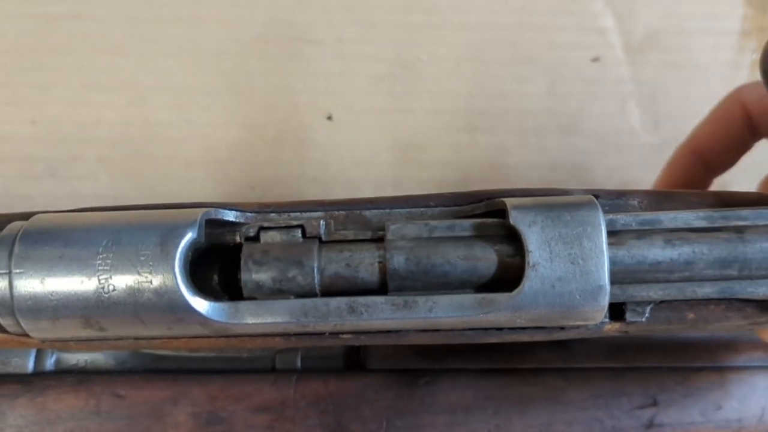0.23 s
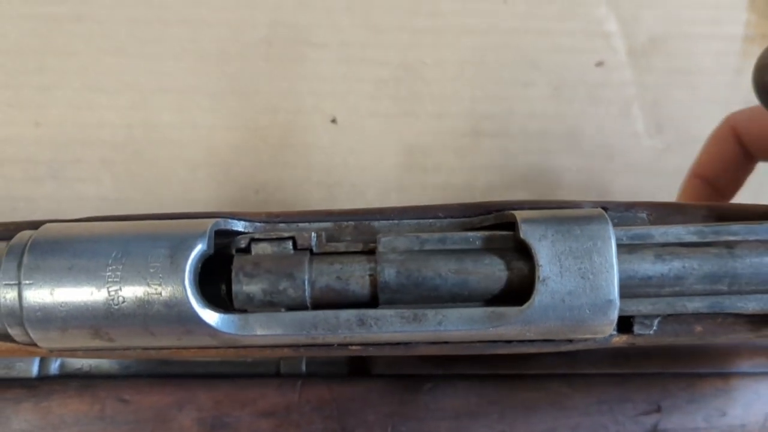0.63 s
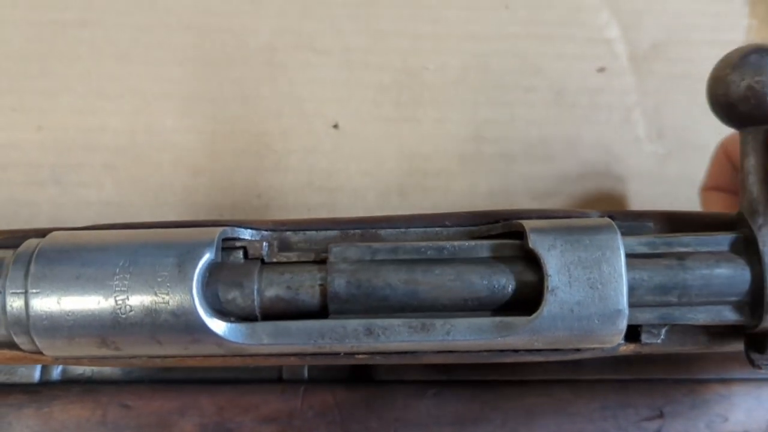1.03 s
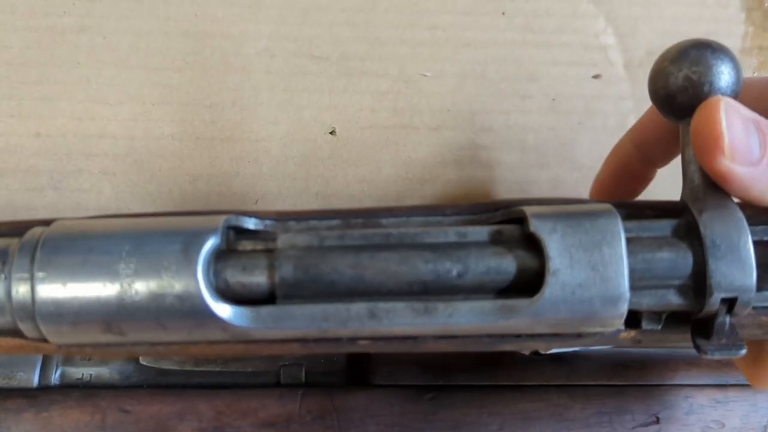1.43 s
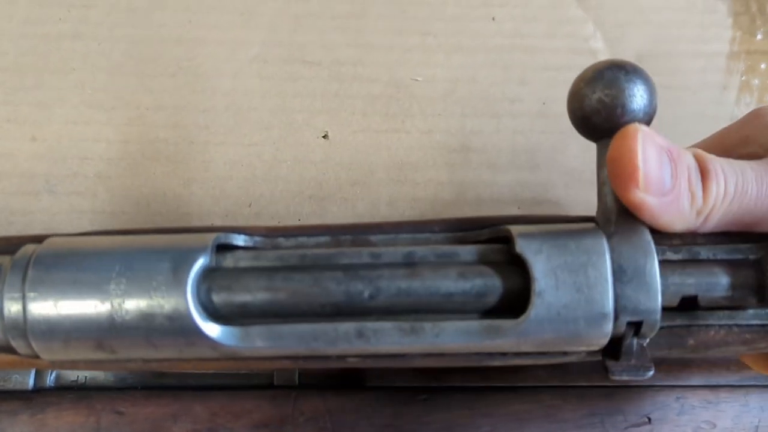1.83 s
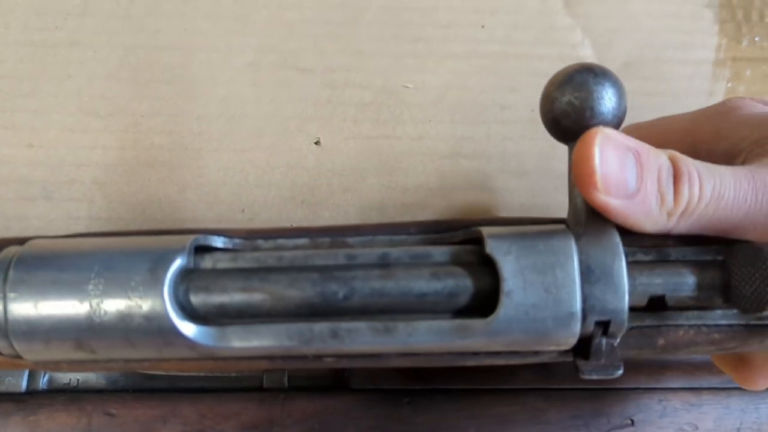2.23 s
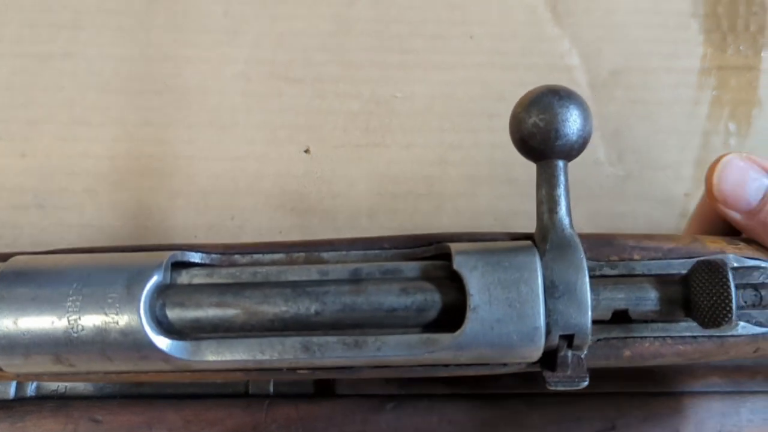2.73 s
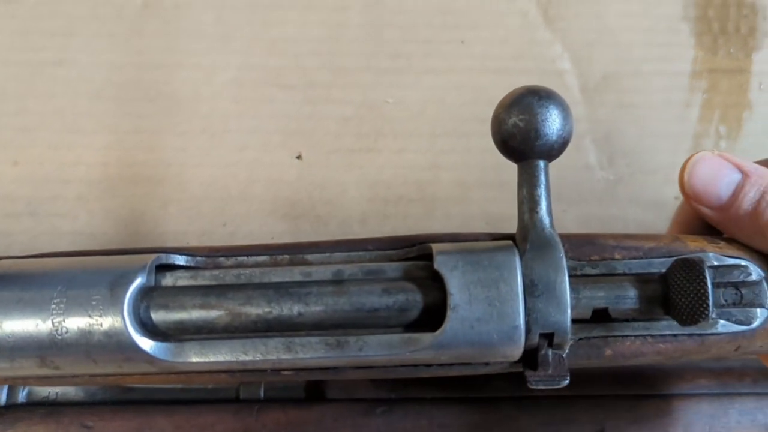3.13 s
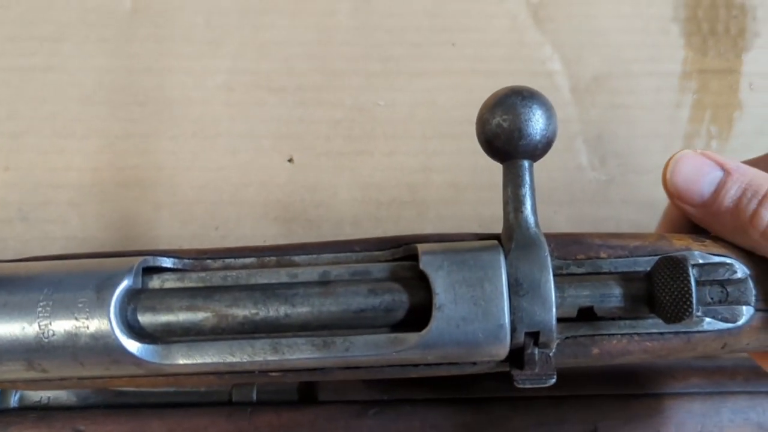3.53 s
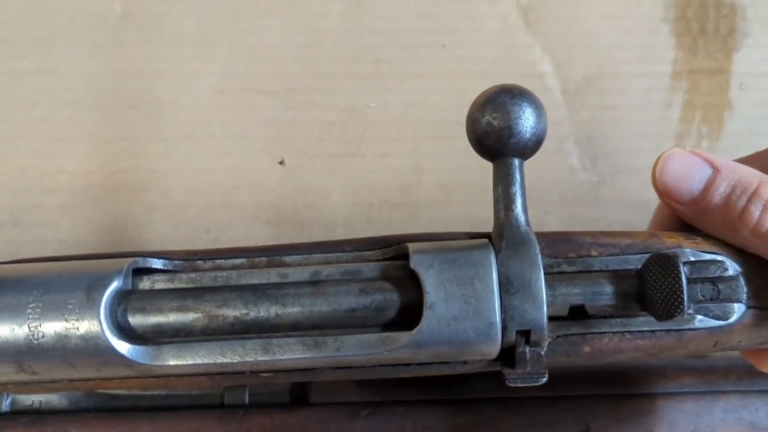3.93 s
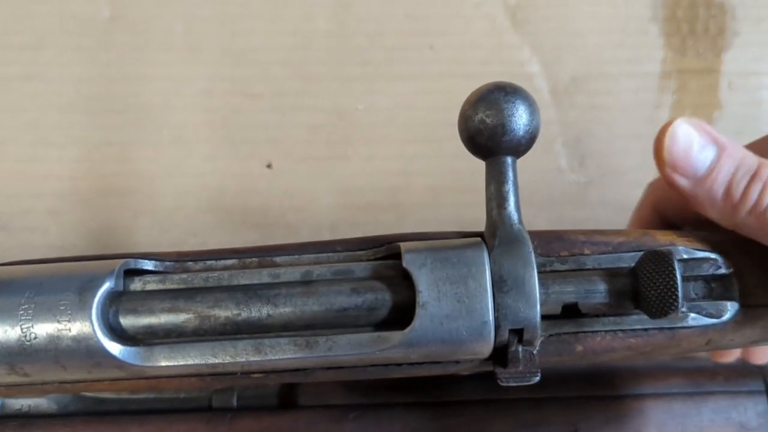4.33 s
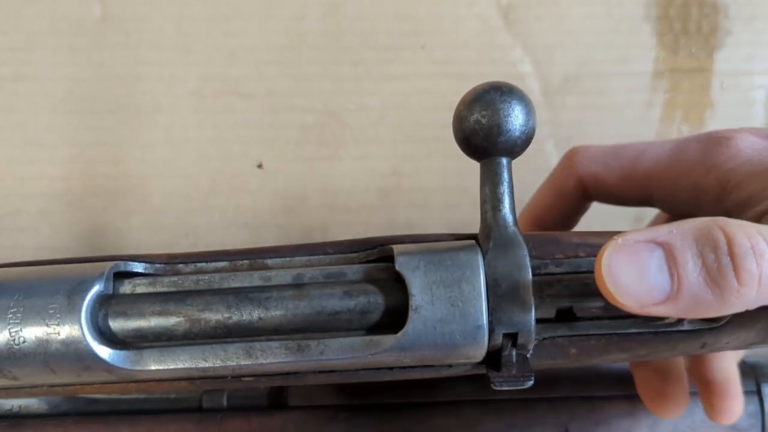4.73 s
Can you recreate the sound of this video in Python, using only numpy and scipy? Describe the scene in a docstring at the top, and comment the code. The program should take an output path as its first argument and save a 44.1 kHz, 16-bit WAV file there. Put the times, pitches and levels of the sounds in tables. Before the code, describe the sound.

Close to a phone microphone in a quiet room, fingers faintly brush metal and wood. A hand pushes a steel rifle bolt forward: a light click, a dry scrape, two sharper ticks, then a hard bright clack. A softer double knock and rasp settle right after. Faint finger brushing and tiny taps come later, over low rumble and thin hiss.

```python
"""A faint brush of fingers opens the scene, close to a phone in a quiet room with a low rumble and hiss.
A hand then pushes a steel rifle bolt home: it scrapes along its rails, knocks past catches and clacks
shut. Light touches of steel and wood follow. Knocks are contact forces that ring decaying modes, and a
short diffuse echo answers them; sliding is gritty noise, the soft rasp is noise through resonators,
and the background is shaped noise."""
import sys
import numpy as np
from scipy import signal
from scipy.fft import rfft, irfft
from scipy.io import wavfile

SR = 44100
rng = np.random.default_rng(int(sys.argv[2]) if len(sys.argv) > 2 else 0)


def undo_db(level):
    """Turn decibels back into plain size, where 20 dB means ten times bigger."""
    steps = np.asarray(level, float) / 20
    return 10 ** steps


def waveform_to_disk(signal):
    """Save audio, clipped to [-1, 1], as 16-bit WAV at the path in sys.argv[1]."""
    frames = np.transpose(np.atleast_2d(signal))
    scaled = np.clip(frames, -1, 1) * 32767
    samples = np.round(scaled).astype(np.int16)
    wavfile.write(sys.argv[1], SR, samples)


N = 220455  # samples

# knocks of the bolt and light touches of steel and wood:
# start_s, ring_peak_db, ring_centre_hz, crack_peak_db, contact_ms
KNOCKS_AND_TOUCHES = [(.518, -44.5, 1190, -79, 7.9), (.5935, -42, 1150, -50, 3.1), (.72, -62, 1850, -78, 8),
                      (.8535, -35.5, 1800, -60, 21), (.860, -28.5, 2000, -60, 7),
                      (.8685, -37.5, 2650, -53, 5.6), (1.113, -39.5, 1900, -58, 6.6),
                      (1.122, -38, 2150, -60, 2.4), (1.1374, -22.5, 2440, -27, 1),
                      (1.1415, -31.5, 1450, -52, 1.35), (1.192, -19.5, 2270, -11, 1.34),
                      (1.196, -24.5, 2180, -34, 1.8), (1.358, -35, 1780, -55, 1.8),
                      (1.362, -25, 1880, -27.5, .84), (1.3645, -20.5, 1900, -18, 2.5),
                      (1.3682, -14.5, 1950, -5, 2.15), (1.3693, -7.5, 2350, -15, 1.1),
                      (1.3705, -25.5, 700.4, -30, 2.15), (1.3735, -25.5, 1891, -32.5, 1.8),
                      (1.596, -44.5, 1500, -47, 4.1), (1.61, -39.5, 897, -49.5, 2.8),
                      (1.622, -41.5, 2040, -60, 4), (1.639, -52, 2500, -22.5, 2.2),
                      (1.653, -27, 658, -58, 7), (1.658, -27, 1400, -51, 3.9),
                      (1.665, -28, 1083, -57, 4.73), (1.676, -40, 1645, -60, 3.1),
                      (1.736, -50, 1916, -67.5, 2.5), (1.848, -56, 703, -80.5, 2.6),
                      (2.3416, -64.5, 691.5, -49.5, 1.25), (4.526, -55.5, 2106, -74, 6.8),
                      (4.812, -54.5, 896, -57, 2.4), (4.839, -47.5, 1386, -67, 5.6),
                      (4.848, -50, 1250, -68.5, 5), (4.875, -60, 1316, -51, 4),
                      (4.937, -65, 1584, -62, 3.4)]
# modes of the bolt in its receiver and stock: pitch_hz, level_db, t60_s
ACTION_MODES = [(600, -6, .03), (720, -6, .025), (835, -4, .03), (960, -8, .025), (1090, -6, .025),
                (1270, -8, .025), (1490, -6, .02), (1640, -6, .02), (1750, -2, .035), (1835, -3, .03),
                (1910, 0, .03), (2030, -2, .025), (2250, 0.5, .02), (2420, 0.5, .02), (2600, -2, .02),
                (2800, -8, .015), (3050, -11, .012), (3370, -12, .012), (3800, -12, .01), (4460, -4, .004),
                (5100, -5, .004), (6450, -3, .004), (7150, -1, .004), (8900, -3, .004), (9550, -5, .006),
                (10900, 0, .004), (11750, -6, .008), (13800, -3, .003), (15200, -2, .003)]
CRACK_BOTTOM_HZ, CRACK_CENTRE_HZ = 4000, 10700
LOW_MODES = 19  # the modes below CRACK_BOTTOM_HZ
# spread about the contact's centre, before a knock's level scales it; the scale gained per dB of level
RING_OCTAVES, CRACK_OCTAVES, WIDENING_PER_DB = 0.74, 0.91, 0.021
RING_PAN_DB, CRACK_PAN_DB = 4, 3  # left minus right
RADIATES_ABOVE_HZ = 500  # the action is too small to sound below this
THUMP_DB = -19.5  # what the table top passes on below that pitch

# the bolt sliding on its rails: time_s, level_db
SLIDE_LEVEL = [(.81, -101), (.824, -65), (.862, -46), (.913, -68.5), (.96, -86), (1.034, -68.5),
               (1.13, -58.5), (1.139, -43.5), (1.183, -67), (1.192, -54.5), (1.37, -59.5), (1.40, -51.5),
               (1.55, -64.5), (1.575, -55), (1.648, -45.5), (1.717, -55.5), (1.728, -75), (1.811, -65),
               (1.83, -100)]
SLIDE_TILT_DB = -2  # per octave

# drag of bolt and hand on the action, a soft rasp: time_s, level_db, centre_hz, edge_db
RASP = [(0, -68, 1870, -9), (.21, -74.5, 1840, -4.5), (.44, -80, 1850, 9), (.55, -74, 1680, -2),
        (.82, -77.5, 1820, 2), (1.02, -68.5, 1800, 2), (1.18, -61, 1870, -3), (1.21, -48, 1850, -26),
        (1.35, -58.5, 1873, -22), (1.39, -42.5, 1880, -4), (1.56, -55, 1862, 2.5), (1.6, -52.5, 1890, 1),
        (1.77, -61.5, 1790, -2), (1.82, -74, 1696, -3), (2.2, -87.5, 1797, -6), (2.27, -72, 2026, -6.5),
        (2.36, -81.5, 1900, -4), (2.6, -76, 1850, -5.5), (2.72, -75, 1706, 0), (2.98, -77, 1715, 1.5),
        (3.15, -92.5, 1706, -6), (4.4, -88, 1682, -6), (4.64, -81, 1801, -6), (5, -81, 1783, -6)]
RASP_OCTAVES, EDGE_HZ, EDGE_OCTAVES = 0.17, 3200, 0.3  # edge: a second, higher and wider band

# fingers brushing steel and wood: start_s, length_s, start_level_db, end_level_db, tilt_db_per_octave
STROKES = [(.022, 0.019, -86, -67.5, -4), (0.334, 0.19, -77, -62, -6), (0.576, 0.044, -62.5, -57.5, 0.7),
           (0.667, 0.0046, -78, -64.5, 3.1), (0.703, 0.03, -66.5, -66.5, 2.2), (2.342, .041, -69, -77.5, 3),
           (2.422, 0.22, -59.5, -61, 1.16), (4.518, .018, -75.5, -66, -1.3), (4.569, 0.12, -78, -72.5, 0),
           (4.812, 0.084, -63, -59, 0.8), (4.931, 0.0067, -68, -64, 2.5)]
# relative spectrum of sliding noise, before its tilt: pitch_hz, level_db
SLIDING_COLOUR = [(400, -39.5), (700, -17.5), (1200, -8), (1650, -10), (1850, -3.5), (2250, -7.5),
                  (3400, -5.5), (4500, -9), (6200, -7), (7400, -6.5), (8100, -13.5), (9500, -11),
                  (11600, -5.5), (13000, -12.5), (16000, -19.5)]
FADE_IN_MS, FADE_OUT_MS = 7.8, 10.3  # for each 20 dB

# decay of the echo: pitch_hz, t60_s
ECHO_DECAY = [(500, .6), (2000, 0.32), (6000, 0.48), (14000, 0.3)]
# colour of the sound that feeds the echo: pitch_hz, gain_db
ECHO_COLOUR = [(300, -31.5), (600, -1), (1200, 5), (1600, -1.5), (1850, -2), (2150, -3.5), (2800, 3),
               (4500, 2), (8000, -4), (15000, -3.5)]
ECHO_DB, ECHO_GAP_S = -12, 0.00067

# relative spectrum of the rumble, before the standing waves: pitch_hz, level_db
RUMBLE_COLOUR = [(18, -49.5), (30, -21), (43, -13), (75, -10.5), (113, -3.5), (131, -3), (147, -19),
                 (194, -5), (307, -20.5), (338, -26.5), (379, -27.5), (526, -27.5), (1500, -43.5),
                 (1950, -85.5), (3300, -120)]
# standing waves of the room: pitch_hz, width_hz, boost_db
STANDING_WAVES = [(54.3, 20, 8.5), (111, 23, 2), (190, 48, 7), (320, 21, 2.5)]
# correlation of left and right in the rumble: pitch_hz, correlation
RUMBLE_LIKENESS = [(60, 0.93), (130, 0.95), (290, 0.92), (640, 0.6), (1410, 0), (3100, -0.09), (6820, 0.04),
                   (15000, 0.08)]
RUMBLE_DB = -56.5
# relative spectrum of the microphone hiss: pitch_hz, level_db
HISS_COLOUR = [(590, -29.5), (1000, -6.5), (1320, -5), (1400, -9.5), (1790, -10), (3710, -10), (4070, -10),
               (5380, -13.5), (5830, -11), (7980, -16), (8750, -17), (10300, -15.5), (16000, -22.5)]
# slow wavering of the microphone hiss: time_s, level_db
HISS_WAVER = [(0, -79.5), (.8, -80.5), (2.4, -77.5), (3, -78), (3.4, -82.5), (5, -80.5)]
MIC_BOTTOM_HZ, MIC_TOP_HZ = 43.4, 16300


def knocks():
    """Modal excitation: a short ragged contact force rings the low modes and cracks in the high ones."""
    out = np.zeros((2, N + 8192))
    t = np.arange(1024) / SR
    for start_s, ring_db, ring_hz, crack_db, contact_ms in KNOCKS_AND_TOUCHES:
        push = contact(contact_ms)
        hz, waves = modes(spread=1.69)
        low = hz < CRACK_BOTTOM_HZ
        # louder knocks reach modes further from their centre
        ring_octaves = RING_OCTAVES * max(1.5 + WIDENING_PER_DB * ring_db, .2)
        crack_octaves = CRACK_OCTAVES * max(1.0 + WIDENING_PER_DB * crack_db, .2)
        ring = (waves * low * reach(hz, ring_hz, ring_octaves)).sum(axis=1)
        crack = (waves * ~low * reach(hz, CRACK_CENTRE_HZ, crack_octaves)).sum(axis=1)
        # every contact also spits a broad, very short burst
        burst = rng.standard_normal((2, len(t))) * np.exp(-t / .0004)
        crack[:, :len(t)] += .8 * burst
        first = int(start_s * SR)
        for part, db, pan_db in ((ring, ring_db, RING_PAN_DB), (crack, crack_db, CRACK_PAN_DB)):
            heard = signal.fftconvolve(part, push[None], axes=1)
            peak = np.abs(signal.hilbert(heard)).max(axis=1, keepdims=True)
            out[:, first:first + heard.shape[1]] += undo_db(db) * heard / peak * sides(pan_db)
    return out[:, :N]


def contact(contact_ms, count=1024):
    """Ragged contact force: it bites fast and chatters away, with its spectrum made flat."""
    span = 1000 * np.arange(count) / SR / max(contact_ms, .1)  # in contact times
    shape = (1 - np.exp(-span / 0.29)) * np.exp(-1.2 * span)
    push = rng.standard_normal(count)
    # alternate between the shape in time and a flat spectrum
    for _ in range(4):
        spectrum = rfft(push * shape)
        push = irfft(spectrum / np.abs(spectrum), count)
    return push


def modes(spread, count=2048):
    """Free decay of each mode after a unit blow; the right microphone hears it at another phase."""
    hz, db, t60 = np.transpose(ACTION_MODES)[:, :, None]
    t = np.arange(count) / SR
    sign = rng.choice([-1., 1.], (len(hz), 1))
    right_only = np.array([0, 1])[:, None, None]
    phase = right_only * spread * rng.standard_normal((len(hz), 1))  # radians
    decay = np.exp(-np.log(1000) * t / t60)
    return hz, sign * undo_db(db) * decay * np.sin(2 * np.pi * hz * t + phase)


def reach(hz, centre_hz, octaves):
    """Selective excitation: a contact centred on one pitch moves modes the less, the further they lie."""
    distance = np.log2(hz / centre_hz) / octaves
    return np.exp(-.5 * distance ** 2) + .12 * octaves


def slide():
    """Sliding friction: steel running on steel gives broad noise while the bolt travels."""
    t = np.arange(N) / SR
    moving = (t > SLIDE_LEVEL[0][0]) & (t < SLIDE_LEVEL[-1][0])
    return moving * undo_db(curve(SLIDE_LEVEL)[0]) * hiss(N, SLIDE_TILT_DB) * sides(4.0)


def drag():
    """Forced resonance: fine roughness of uneven grain shakes the low modes near the rasp's pitch."""
    db, centre_hz, edge_db = curve(RASP)
    grain = undo_db(3.0 * rng.exponential(size=N))
    rasp, power = 0, 0
    for hz, mode_db, t60 in ACTION_MODES[:LOW_MODES]:
        pole = np.exp(-np.log(1000) / (t60 * SR))
        resonator = [1, -2 * pole * np.cos(2 * np.pi * hz / SR), pole ** 2]
        shaken = signal.lfilter([1], resonator, grain * rng.standard_normal((2, N)))
        edge = undo_db(edge_db) * reach(hz, EDGE_HZ, EDGE_OCTAVES)
        weight = undo_db(mode_db) * (reach(hz, centre_hz, RASP_OCTAVES) + edge)
        rasp = rasp + weight * unit(shaken)
        power = power + weight ** 2
    return undo_db(db) * rasp / np.sqrt(power) * sides(3.6)


def brushes():
    """Skin friction: a hiss that starts and stops with the hand."""
    out = np.zeros((2, N + SR))
    t = np.arange(SR // 2) / SR - .1  # leaves 0.1 s for the fade in
    for start_s, length_s, start_db, end_db, tilt_db in STROKES:
        before_ms = 1000 * np.maximum(-t, 0)
        after_ms = 1000 * np.maximum(t - length_s, 0)
        fade_db = -20 * (before_ms / FADE_IN_MS + after_ms / FADE_OUT_MS)
        level_db = np.interp(t, [0, length_s], [start_db, end_db]) + fade_db
        first = int(start_s * SR)
        out[:, first:first + len(t)] += undo_db(level_db) * hiss(len(t), tilt_db)
    return out[:, SR // 10:N + SR // 10] * sides(4.0)


def hiss(count, tilt_db):
    """Friction noise: many small slips sum to a broad, slightly gritty noise of rms 1."""
    hz = np.fft.rfftfreq(count, 1 / SR)
    octaves = np.log2(np.maximum(hz, 500) / 6000)  # the tilt turns about 6 kHz
    grit = undo_db(1.2 * rng.exponential(size=count)) * rng.standard_normal((2, count))
    spectrum = rfft(coloured(grit, SLIDING_COLOUR))
    return unit(irfft(spectrum * undo_db(tilt_db * octaves), count))


def room(x):
    """Diffuse reverberation: noise that dies away band by band, unrelated left and right."""
    t = np.arange(SR) / SR
    noise, hz = rfft(rng.standard_normal((2, SR))), np.fft.rfftfreq(SR, 1 / SR)
    tail = 0
    for centre_hz in 250 * 2. ** np.arange(7):
        octaves_off = np.abs(np.log2(np.maximum(hz, 1) / centre_hz))
        band = irfft(noise * np.clip(1 - octaves_off, 0, 1), SR)
        tail = tail + band * np.exp(-np.log(1000) * t / on_log(ECHO_DECAY, centre_hz))
    # the echo builds up once the nearest walls have answered
    tail = tail * (1 - np.exp(-(t / ECHO_GAP_S) ** 2))
    tail = undo_db(ECHO_DB) * tail / np.sqrt(np.sum(tail ** 2, axis=1, keepdims=True))
    return signal.fftconvolve(coloured(x, ECHO_COLOUR), tail, axes=1)[:, :N]


def floor():
    """Room resonance: standing waves swell a far rumble, alike in the bass, under unrelated hiss."""
    hz = np.fft.rfftfreq(N, 1 / SR)
    db = on_log(RUMBLE_COLOUR, hz)
    for wave_hz, width_hz, boost_db in STANDING_WAVES:
        db = db + boost_db / (1 + (2 * (hz - wave_hz) / width_hz) ** 2)
    alike = np.clip(on_log(RUMBLE_LIKENESS, hz), 0, .99)
    mid, side = rfft(rng.standard_normal((2, N)))
    pair = np.sqrt(1 + alike) * mid + np.sqrt(1 - alike) * side * np.array([[1], [-1]])
    rumble = undo_db(RUMBLE_DB) * unit(irfft(pair * undo_db(db), N)) * sides(0.76)
    mic_hiss = unit(coloured(rng.standard_normal((2, N)), HISS_COLOUR))
    return rumble + undo_db(curve(HISS_WAVER)[0]) * mic_hiss * sides(1.0)


def unit(x):
    """Normalisation by mean power: scale to rms 1."""
    return x / np.sqrt(np.mean(x ** 2))


def on_log(table, hz):
    """Pitch is logarithmic in frequency: read a table along that axis."""
    f, v = np.transpose(table)
    return np.interp(np.log(np.maximum(hz, 1)), np.log(f), v)


def coloured(x, table):
    """Linear filtering: multiply the spectrum of x by the gains of a table in dB."""
    hz = np.fft.rfftfreq(x.shape[-1], 1 / SR)
    return irfft(rfft(x) * undo_db(on_log(table, hz)), x.shape[-1])


def sides(db):
    """Level difference between channels: left and right gains for left minus right in dB."""
    return undo_db(np.array([[db], [-db]]) / 2)


def curve(table):
    """Linear interpolation in time: the columns of a table at every sample."""
    s, *columns = np.transpose(table)
    return [np.interp(np.arange(N) / SR, s, c) for c in columns]


def scene():
    """Superposition: the action close by, its echo, and the background add as pressures."""
    blows = knocks()
    above = signal.cheby1(8, .5, RADIATES_ABOVE_HZ, "high", fs=SR, output="sos")
    below = signal.butter(2, RADIATES_ABOVE_HZ, fs=SR, output="sos")
    hits = signal.sosfilt(above, blows)
    thump = undo_db(THUMP_DB) * signal.sosfilt(below, blows.sum(axis=0))  # alike on both sides
    return hits + thump + room(hits) + brushes() + slide() + drag() + floor()


def band_limit(x):
    """A steep low-pass at the top of the band."""
    return signal.sosfilt(signal.butter(12, 17000, fs=SR, output="sos"), x)


def record(dry):
    """Band limiting: the phone cuts the deepest bass and the top."""
    bass_cut = signal.butter(4, MIC_BOTTOM_HZ, "high", fs=SR, output="sos")
    top_cut = signal.ellip(8, .2, 70, MIC_TOP_HZ, fs=SR, output="sos")
    mix = signal.sosfilt(top_cut, signal.sosfilt(bass_cut, dry))
    return band_limit(mix)


dry = scene()
out = record(dry)
waveform_to_disk(out)
```